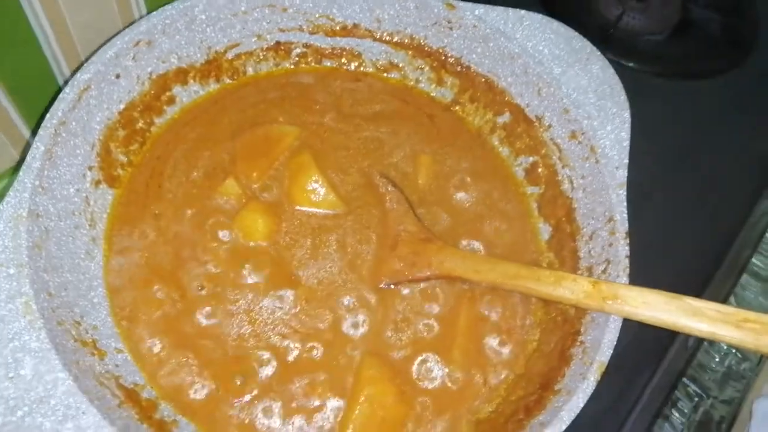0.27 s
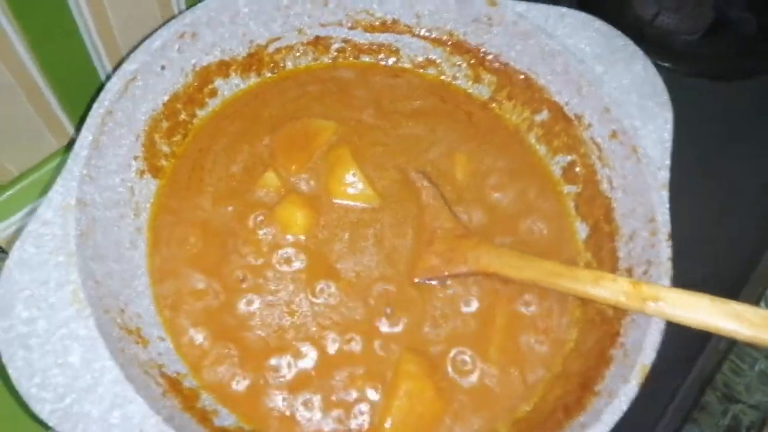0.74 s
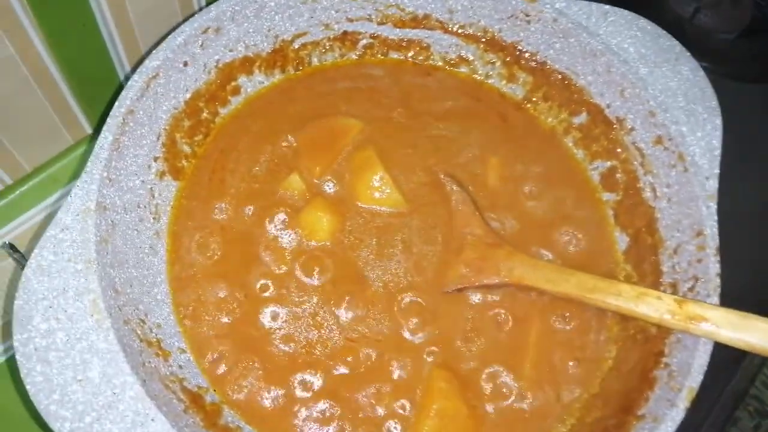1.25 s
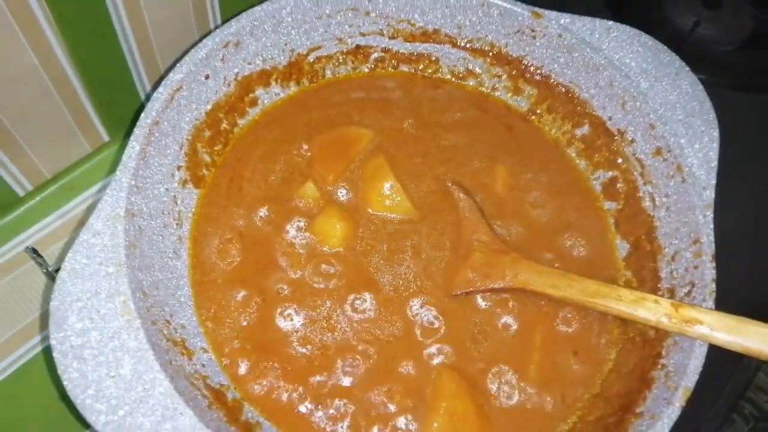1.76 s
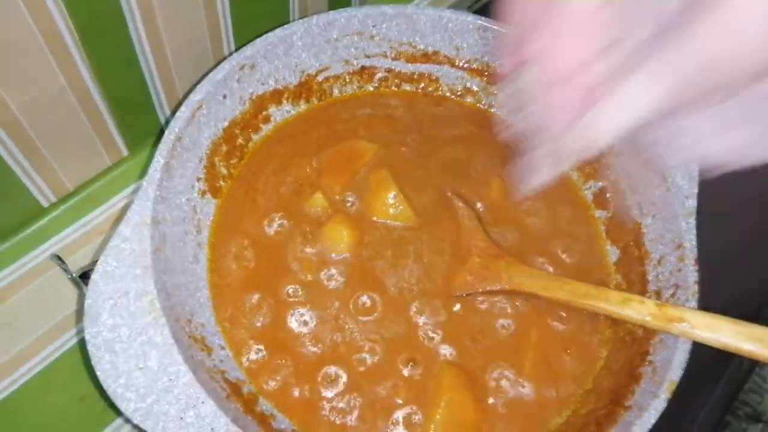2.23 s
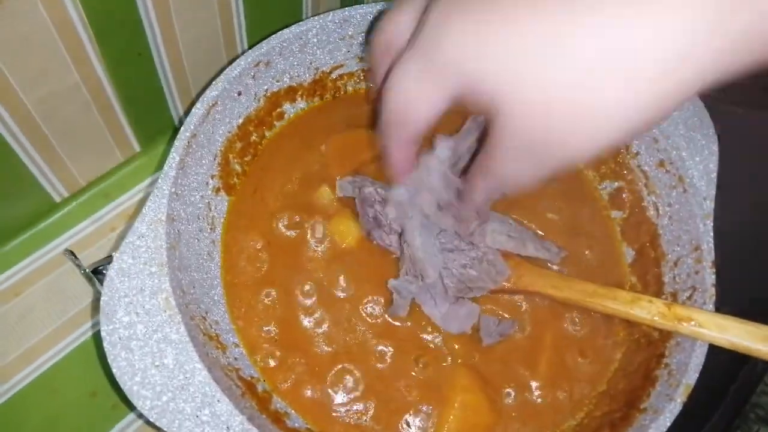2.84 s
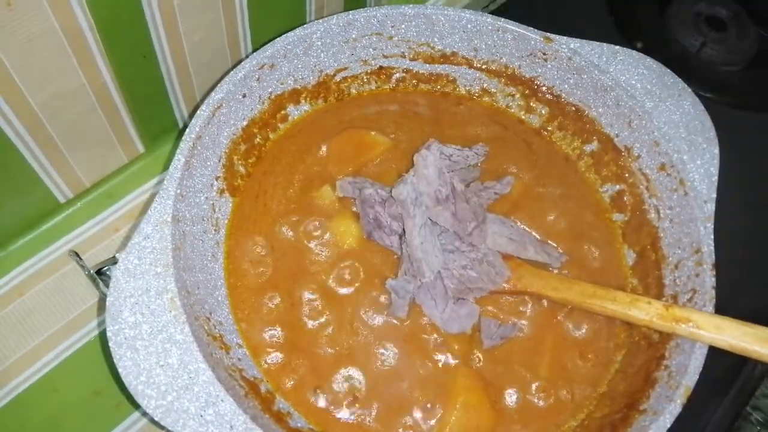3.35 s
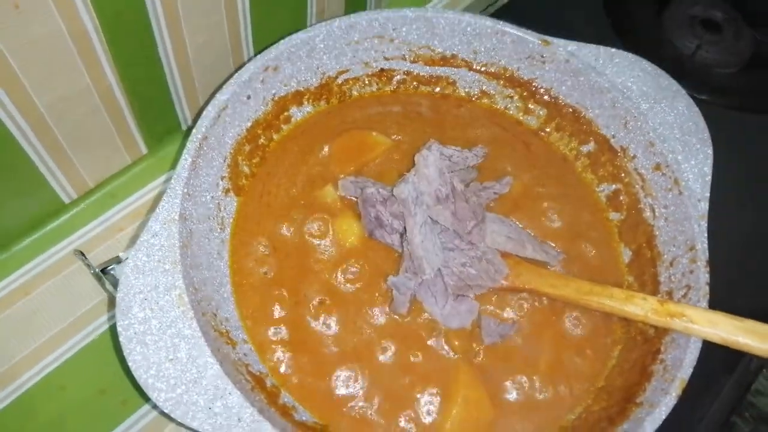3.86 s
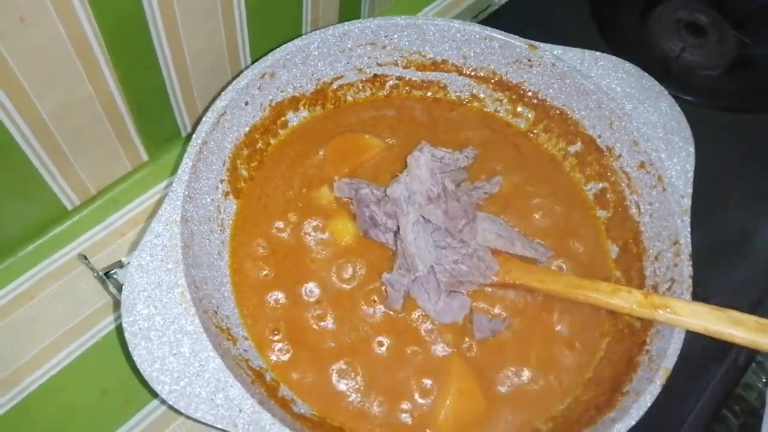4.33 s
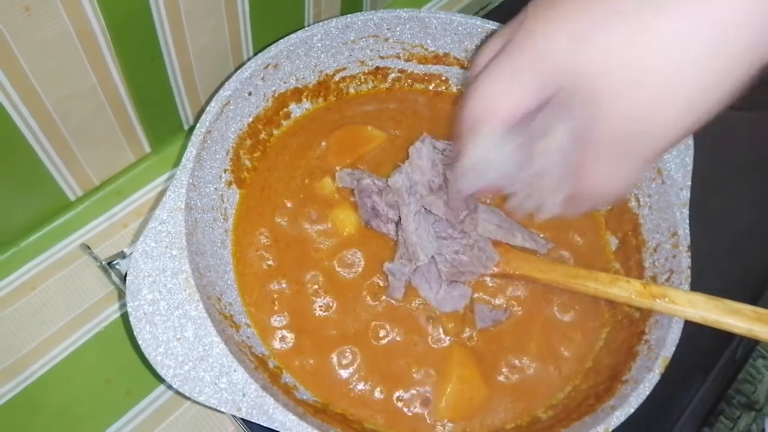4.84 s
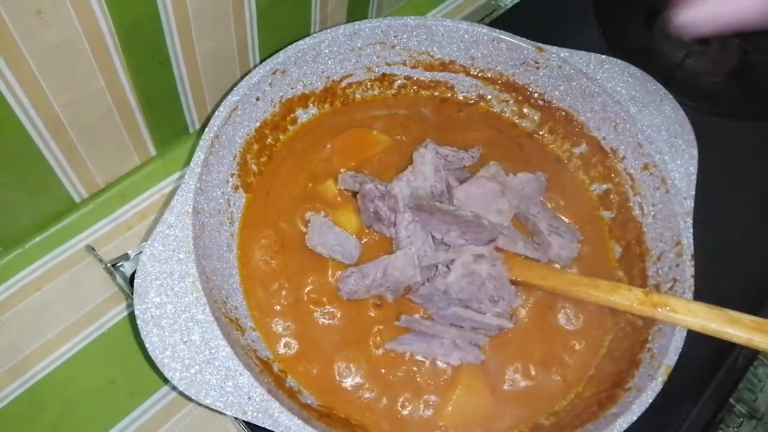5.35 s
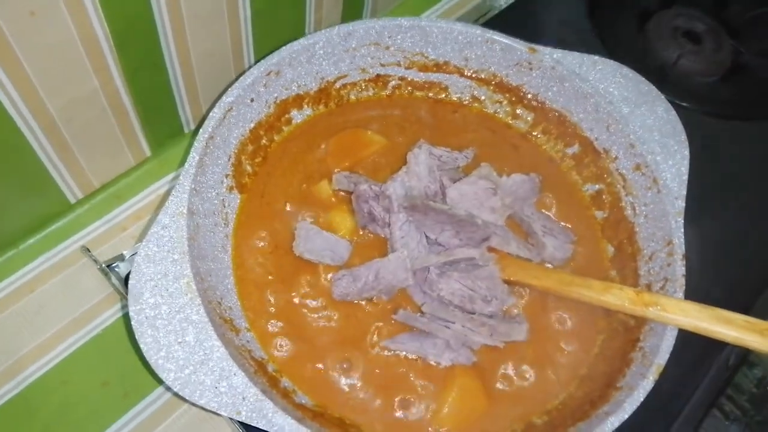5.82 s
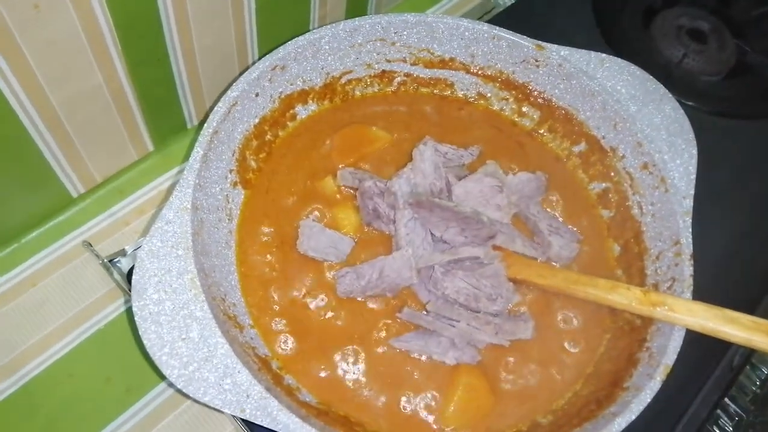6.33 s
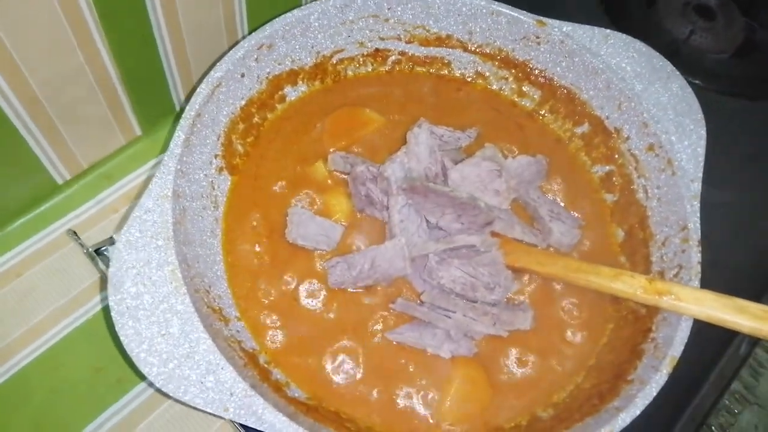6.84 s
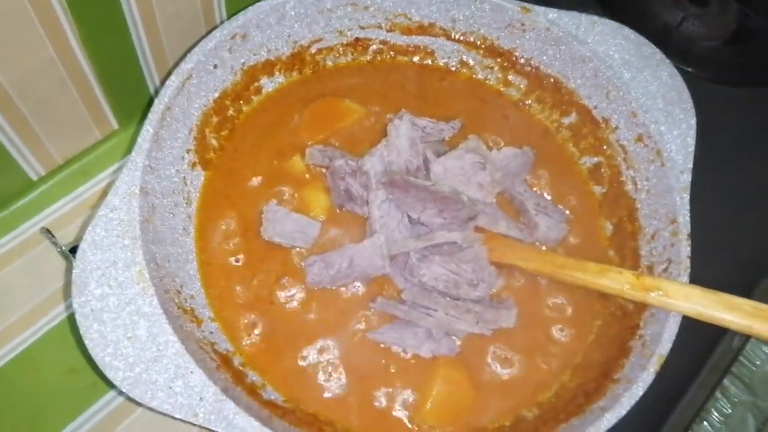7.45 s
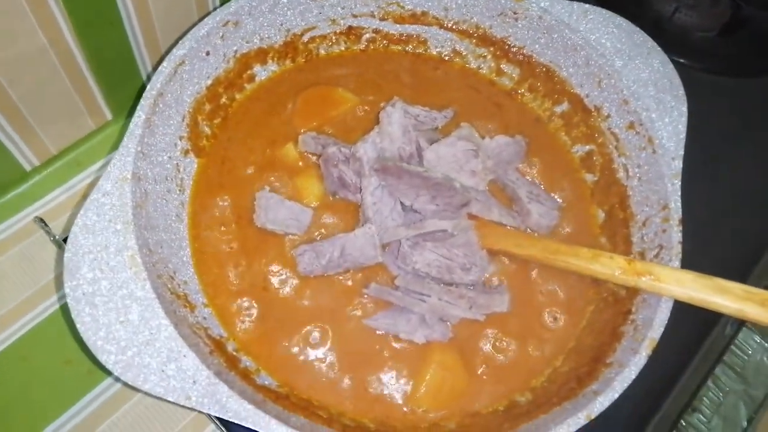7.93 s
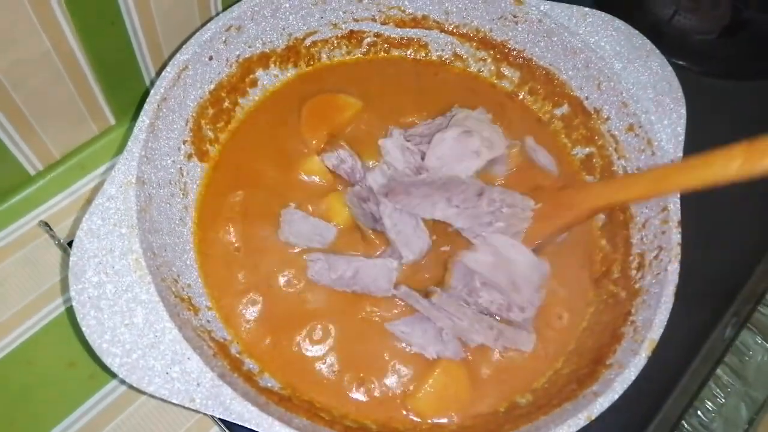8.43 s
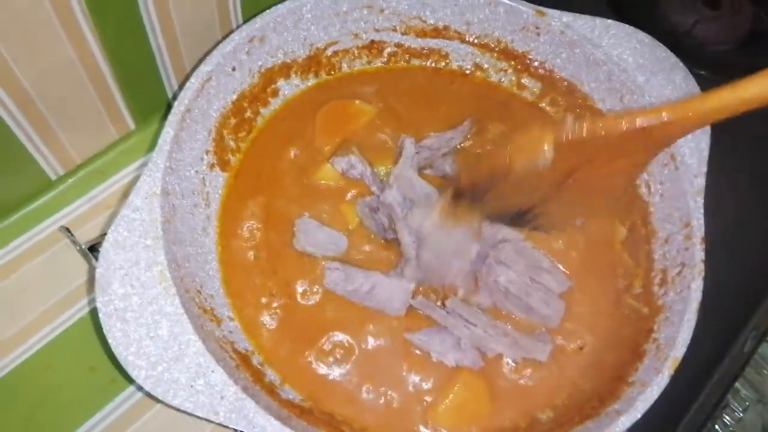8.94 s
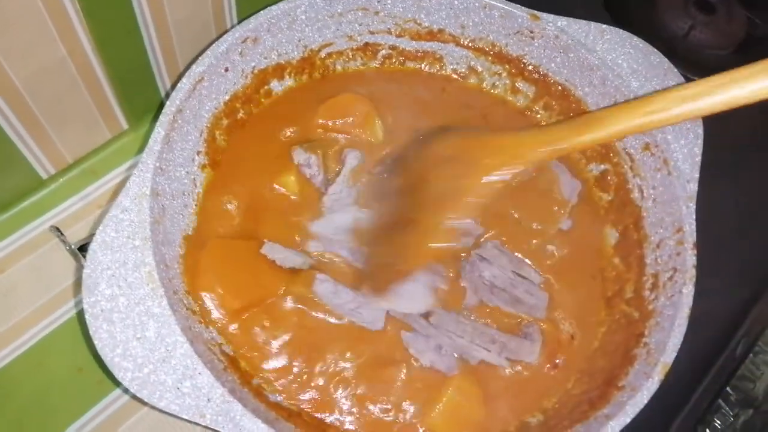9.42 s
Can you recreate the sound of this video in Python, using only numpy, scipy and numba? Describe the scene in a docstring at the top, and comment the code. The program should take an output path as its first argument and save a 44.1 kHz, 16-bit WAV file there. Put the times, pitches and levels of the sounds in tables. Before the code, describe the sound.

Close above a pan, thick curry simmers: crisp, irregular bubble ticks over faint wet fizz, with occasional low plops. One hard knock sounds near the start. A vehicle outside drones low and falls in pitch, fading over the first few seconds. Distant traffic swells later. Light rustles of hands and meat come mid-way, then wetter squelches as a spatula stirs. Nearly mono phone sound, treble dulled, small kitchen.

```python
"""A thick curry simmers in a pan below a phone: small bubbles burst as short bright ticks, large ones plop; each is
a damped tone that glides up, over crowds of faint ones and flickering wet noise. Hands and meat rustle as
crackling noise, something hard knocks as short damped modes, and soft rings are narrow noise. A vehicle outside
drones as a sine with a weak octave, falling in pitch; traffic swells behind it as hums, over steady air noise.
The level dips now and then. The microphone is nearly mono and dull above the presence range."""
import sys
import numpy as np
from scipy import signal
from scipy.fft import rfft, irfft, next_fast_len
from scipy.io import wavfile
from scipy.ndimage import uniform_filter1d
from numba import njit

SR = 44100
rng = np.random.default_rng(int(sys.argv[2]) if len(sys.argv) > 2 else 0)


def generate_wav(signal):
    """Clip the signal to [-1, 1] and save it as 16-bit WAV at the path in sys.argv[1]."""
    frames = np.transpose(np.atleast_2d(signal))
    scaled = np.clip(frames, -1, 1) * 32767
    pcm = np.round(scaled).astype(np.int16)
    wavfile.write(sys.argv[1], SR, pcm)


N = 426888  # length in samples


def undb(db):
    """Amplitude ratio of a level in dB."""
    return 10 ** (np.asarray(db) / 20)


def level(x, db):
    """Set the rms of a sound to a level in dB."""
    return x * undb(db) / np.sqrt(np.mean(x ** 2))


def curves(table):
    """Columns of a table as straight lines in time."""
    s, *columns = np.transpose(table)
    return [np.interp(np.arange(N) / SR, s, c) for c in columns]


def swells(table, rise_db_s, fall_db_s, *calm_db):
    """Each row rises to its start, holds and falls; per column, powers add up over a calm level, in dB."""
    t = np.arange(N) / SR
    power = undb(calm_db)[:, None] ** 2 * np.ones(N)
    for s, hold_s, *db in table:
        before_s = np.maximum(s - t, 0)
        after_s = np.maximum(t - s - hold_s, 0)
        shape = undb(-rise_db_s * before_s - fall_db_s * after_s) ** 2
        power = power + undb(db)[:, None] ** 2 * shape
    return 10 * np.log10(power)


def walk(rate):
    """Random levels held 1 / rate s and slewed twice; spread near 1."""
    k = int(SR / rate)
    steps = np.repeat(rng.standard_normal(N // k + 1), k)
    return 1.3 * uniform_filter1d(uniform_filter1d(steps, k), k)[:N]


def colour(x, points):
    """Filter by a spectrum of (Hz, dB) points; rms 1."""
    size = next_fast_len(len(x))
    hz, db = np.transpose(points)
    grid = np.arange(size // 2 + 1) * SR / size
    gain = undb(np.interp(np.log(grid + 1), np.log(hz), db, left=-90, right=-90))
    return level(irfft(rfft(x, size) * gain, size)[:len(x)], 0)


def band(x, lo_hz, hi_hz):
    """Keep one frequency band; rms 1."""
    sos = signal.butter(2, [lo_hz, hi_hz], "bandpass", fs=SR, output="sos")
    return level(signal.sosfilt(sos, x), 0)


def patchy(points, lo_hz, flicker_db, rate, count):
    """Noise of a given spectrum in third-octave bands, from lo_hz up, that each flicker alone; rms 1."""
    noise = colour(rng.standard_normal(N), points)
    out = 0
    for hz in lo_hz * 2 ** (np.arange(count) / 3):
        edges_hz = [hz * 2 ** (-1 / 6), hz * 2 ** (1 / 6)]
        sos = signal.butter(2, edges_hz, "bandpass", fs=SR, output="sos")
        out = out + undb(flicker_db * walk(rate)) * signal.sosfilt(sos, noise)
    return level(out, 0)


@njit
def rings(length, start_s, size, hz, t60_s, rise_s, glide, rate):
    """Damped tones that swell for rise_s and glide up by the share glide within one t60."""
    out = np.zeros(length)
    for k in range(len(hz)):
        first, phase = int(start_s[k] * rate), 0.
        for i in range(min(int(t60_s[k] * rate), length - first)):
            t = i / rate
            phase += 2 * np.pi * hz[k] * (1 + glide[k] * t / t60_s[k]) / rate
            swell = np.sin(np.pi / 2 * min(t / rise_s, 1.)) ** 2
            out[first + i] += size[k] * swell * np.exp(-np.log(1000) * t / t60_s[k]) * np.sin(phase)
    return out


def bubbles(s, db, hz, cycles, glide, rise_s, spray_db):
    """Each burst cavity rings for a few cycles, rising as it closes; droplets of other pitch land after it."""
    chance = rng.random((len(s), 11)).T
    t60_s = cycles * (.7 + .6 * chance[0]) / hz
    out = rings(N, s, undb(db), hz, t60_s, rise_s, glide * chance[1], 1. * SR)
    # three droplets for each burst
    for pitch, late, size in chance[2:].reshape(3, 3, -1):
        drop_hz = hz * 1.6 ** (pitch - .4)
        drop_s = s + 9 * late ** 2 / hz
        drop_size = undb(db + spray_db - 1.82 * size)
        out += rings(N, drop_s, drop_size, drop_hz, 1.11 * t60_s, rise_s, 0 * hz, 1. * SR)
    return out


def crowd(db, hz, spread, lift_db, tail_db, cycles, rise_s, count):
    """Many faint bursts at random times and pitches; their size follows a level curve."""
    chance = rng.random((count, 3)).T
    at = (chance[0] * (N - 1)).astype(int)
    size_db = db[at] + lift_db - tail_db * np.log(1 - .97 * chance[1])  # a few stand out
    pitch_hz = np.broadcast_to(hz, N)[at] * spread ** (chance[2] - .5)
    return bubbles(at / SR, size_db, pitch_hz, cycles, 0.069, rise_s, -1.4)


def clear_bursts():
    """Bubbles near enough to be heard singly: a larger cavity rings lower and for more cycles."""
    # The clearest small bubbles. Each row: start in seconds, peak level in dB, pitch in Hz.
    ticks = [(0.0399, -24.5, 4930), (0.152, -24, 3380), (0.167, -27, 2530), (0.2056, -21.5, 3230),
             (0.225, -28.5, 3270), (0.424, -26, 3720), (0.522, -23, 5370), (0.599, -30.5, 3900),
             (0.638, -25, 3450), (0.6553, -24, 3620), (0.908, -20, 3700), (0.925, -28.5, 3370),
             (0.9425, -21.5, 3870), (1.102, -24, 3640), (1.104, -26, 2590), (1.121, -20.5, 4450),
             (1.1343, -15.5, 5800), (1.145, -28, 4620), (1.164, -25.5, 4040), (1.273, -24, 3520),
             (1.289, -25.5, 5200), (1.322, -24.5, 3150), (1.408, -24.5, 3830), (1.5058, -22.5, 5700),
             (1.5596, -17.5, 5150), (1.6558, -23, 4860), (1.7153, -25, 3500), (1.727, -29.5, 5000),
             (1.9548, -24.5, 4450), (2.124, -29.5, 3706), (2.5398, -24, 3850), (2.653, -21, 3600),
             (2.707, -24, 5460), (2.78, -30, 3760), (2.789, -24.5, 3450), (2.811, -20, 4220),
             (2.8197, -22, 5160), (2.8913, -23.5, 3600), (2.968, -13.5, 3710), (3.013, -24, 3700),
             (3.033, -19, 4120), (3.0872, -20, 3620), (3.116, -23, 4070), (3.29, -26, 2670),
             (3.3158, -22.5, 2690), (3.405, -27, 4700), (3.51, -23, 5370), (3.541, -21, 3680),
             (3.573, -29, 4160), (3.5966, -22, 3600), (3.6311, -17.5, 3190), (3.636, -32, 2520),
             (3.6904, -22, 3520), (3.7342, -19, 3660), (3.74, -17.5, 4640), (4.3962, -26, 2400),
             (4.422, -21, 6160), (4.508, -27.5, 2100), (4.545, -27, 3160), (4.711, -19, 3560),
             (4.755, -26.5, 3800), (4.764, -27, 4100), (4.895, -25, 2440), (4.9155, -24, 3870),
             (5.172, -19.5, 2770), (5.195, -22.5, 3320), (5.2529, -22.5, 2270), (5.278, -28.5, 3400),
             (5.306, -24.5, 3440), (5.357, -20, 5800), (5.3725, -24, 3970), (5.378, -22.5, 3880),
             (5.496, -28, 2470), (5.582, -25, 4040), (5.618, -27, 2430), (5.646, -17.5, 3580),
             (5.708, -18.5, 2360), (5.797, -24, 3300), (5.827, -26, 3500), (5.8562, -17.5, 3780),
             (5.976, -26.5, 3900), (6.097, -29, 3470), (6.115, -19, 3780), (6.148, -20.5, 3620),
             (6.162, -23.5, 3810), (6.218, -25, 3970), (6.2465, -14.5, 3220), (6.2954, -22.5, 4180),
             (6.3574, -17, 3450), (6.3656, -17, 3430), (6.397, -27, 3800), (6.651, -31, 3420),
             (6.663, -25, 2520), (6.663, -20, 3670), (6.697, -25.5, 3520), (6.7321, -22.5, 3360),
             (6.9579, -24, 3070), (7.012, -20, 3230), (7.045, -25.5, 2740), (7.193, -20.5, 3700),
             (7.468, -30, 2180), (7.488, -27, 3900), (7.498, -21, 3340), (7.512, -33, 2520),
             (7.532, -30, 4450), (7.548, -26, 3250), (7.581, -23, 5300), (7.5976, -21.5, 3700),
             (7.725, -30, 4180), (7.9417, -23.5, 3730), (8.181, -29, 2100), (8.1965, -15, 2080),
             (8.209, -26, 2280), (8.2216, -21, 2400), (8.229, -25, 2610), (8.259, -22.5, 2360),
             (8.287, -25.5, 3210), (8.324, -23, 3360), (8.3355, -17.5, 3070), (8.357, -19.5, 3970),
             (8.386, -25, 3320), (8.398, -34, 4230), (8.414, -29, 3300), (8.431, -24, 2470),
             (8.4489, -13.5, 3630), (8.494, -35, 3700), (8.513, -32, 3350), (8.66, -27, 2930),
             (8.687, -28, 2700), (8.786, -22, 4840), (8.795, -26, 4740), (8.859, -25.5, 3800),
             (8.906, -23.5, 3130), (8.917, -30, 3500), (8.956, -21.5, 3670), (9.07, -27.5, 3450),
             (9.102, -29, 2530), (9.149, -29, 3200), (9.187, -24, 2460), (9.2345, -20, 5400),
             (9.25, -22, 2190), (9.268, -34, 2130), (9.278, -18, 2370), (9.295, -24.5, 2860),
             (9.486, -27.5, 2480), (9.547, -26.5, 2400)]
    # Large bubbles and squelches of the spatula. Each row: start in seconds, peak level in dB, pitch in Hz.
    plops = [(0.4, -47, 1060), (1.7914, -35.5, 838), (1.8126, -37, 890), (2.1808, -43.5, 785),
             (2.6412, -37.5, 2050), (2.9084, -43, 810), (2.9674, -43.5, 752), (4.1001, -44.5, 726),
             (4.2288, -38, 1220), (4.3214, -41, 1640), (4.5042, -35, 1280), (4.8639, -41, 1710),
             (4.9169, -34.5, 1260), (5.6453, -41.5, 710), (5.7065, -25, 1900), (5.796, -38, 1680),
             (6.061, -43, 1250), (6.111, -36.5, 1686), (6.1253, -37, 1300), (6.162, -43, 742),
             (6.2497, -40, 1210), (6.3378, -40, 1710), (6.3649, -38, 1820), (6.6617, -27, 1817),
             (6.8673, -42, 1030), (6.9743, -41, 1640), (7.1598, -37, 1740), (7.4195, -39, 424),
             (7.4351, -37, 504), (7.4704, -39, 666), (8.025, -39.5, 666), (8.051, -42.5, 730),
             (8.1864, -25, 1134), (8.2682, -37.5, 683), (8.325, -30.5, 1740), (8.3523, -33, 1680),
             (8.9691, -43.5, 570), (9.124, -44.5, 710), (9.149, -40.5, 682), (9.1892, -24.5, 1723),
             (9.237, -35.5, 647), (9.2482, -26, 1990), (9.2695, -33, 876), (9.2847, -24, 1735)]
    s, db, hz = np.transpose(ticks)
    small = bubbles(s, db, hz, cycles=18.5, glide=0.17, rise_s=0.00089, spray_db=-9.5)
    s, db, hz = np.transpose(plops)
    large = bubbles(s, db, hz, cycles=50.3, glide=0.45, rise_s=0.0023, spray_db=-12.0)
    return small + large


def faint_bursts(fizz_db, fizz_hz, gurgle_db, squelch_db):
    """Crowds of small, middle and large cavities, ringing too faintly to be told apart."""
    small = crowd(fizz_db, fizz_hz, 2.1, lift_db=1.5, tail_db=6.5, cycles=24.7, rise_s=0.00061, count=2400)
    small += crowd(fizz_db, fizz_hz, 1.7, lift_db=12.5, tail_db=2, cycles=28, rise_s=0.0005, count=400)
    small += crowd(fizz_db, 6400., 1.4, lift_db=4, tail_db=3.5, cycles=28, rise_s=0.0005, count=300)
    middle = crowd(squelch_db, 1650., 1.6, lift_db=-4.5, tail_db=4.0, cycles=19.9, rise_s=0.00082, count=1200)
    large = crowd(gurgle_db, 723.0, 1.3, lift_db=0.0, tail_db=3.0, cycles=10.4, rise_s=0.001, count=700)
    return small + middle + large


def wet_hiss(fizz_db, gurgle_db, squelch_db):
    """Noise of the wet surface: a high fizz, a squelch and a low gurgle in bands that flicker alone."""
    # Spectrum of the fizz. Each row: frequency in Hz, density in dB per Hz.
    fizz_spectrum = [(1500, -30), (2200, -10), (2800, -4), (3800, 0), (5000, -3), (6200, -5), (8000, -20),
                     (11000, -50)]
    # Spectrum of the sloshing liquid. Each row: frequency in Hz, density in dB per Hz.
    slosh_spectrum = [(250, -25), (400, -3), (700, 0), (1700, -2), (2600, -6), (4000, -25)]
    fizz = undb(fizz_db - 11) * patchy(fizz_spectrum, 2400, 3, 22, count=6)
    squelch = undb(squelch_db - 6) * patchy(slosh_spectrum, 1275, 4, 45, count=4)
    gurgle = undb(gurgle_db - 6.5) * patchy(slosh_spectrum, 398.4, 4.5, 12, count=5)
    return fizz + squelch + gurgle


def sloshes():
    """Levels in dB of the gurgle and squelch as the thick liquid sloshes."""
    # Wet sloshes. Each row: start in seconds, hold in seconds, low gurgle in dB, higher squelch in dB.
    slosh_rows = [(0, 0.0074, -49.5, -45.5), (.4, 0.02, -58, -78), (1.8, 0.024, -55.5, -89),
                  (2.19, 0.025, -64, -76), (2.62, 0.0088, -56, -56.5), (2.92, 0.11, -76, -62),
                  (4.22, 0.1, -54.5, -57), (4.33, 0.087, -72, -51.5), (4.51, 0.034, -57.5, -50.5),
                  (4.9, 0.047, -48, -50), (5.25, 0.019, -54, -52), (5.62, 0.13, -49.5, -50.5),
                  (5.88, 0.073, -53, -48), (6.08, 0.077, -47, -44), (6.3, 0.018, -53, -68),
                  (6.5, 0.01, -53.5, -73), (6.66, 0.034, -63, -51.5), (6.98, 0.049, -51, -46.5),
                  (7.17, 0.014, -59, -47), (7.425, 0.061, -59, -52.5), (8.02, 0.011, -49.5, -57),
                  (8.184, 0.053, -46.5, -40.5), (8.31, 0.13, -53, -50.5), (8.7, 0.012, -50, -52.5),
                  (8.88, 0.062, -55.5, -62), (9.1, 0.15, -48.5, -57), (9.19, 0.087, -41, -43),
                  (9.57, 0.13, -50, -53.5)]
    calm_gurgle_db, calm_squelch_db = -65.5, -64.5  # between sloshes
    return swells(slosh_rows, 493, 121.5, calm_gurgle_db, calm_squelch_db)  # rise, fall in dB per second


def fizz_drops():
    """Level change of the fizz in dB: a rounded hollow at each brief drop in level."""
    # Brief drops in the level of the fizz. Each row: middle in seconds, depth in dB,
    # seconds from the middle to about half the depth.
    hollows = [(0.34, -15.5, 0.11), (0.564, -3, .04), (1.071, -5, 0.02), (1.864, -6, 0.039),
               (2.018, -19, 0.014), (2.18, -12, 0.042), (2.347, -24, 0.085), (3.247, -4, 0.03),
               (3.451, -24, 0.023), (4.347, -0.5, 0.016), (4.802, -19, 0.0097), (4.977, -20, 0.034),
               (5.242, -11, 0.062), (5.68, -21, 0.016), (6.593, -18, 0.024), (6.787, -11, 0.044),
               (7.34, -10, 0.091)]
    t = np.arange(N) / SR
    return sum(db * np.clip(1 - ((t - s) / half_s / 2) ** 2, 0, 1) ** 2 for s, db, half_s in hollows)


def simmer(squelch_db):
    """Level in dB and pitch in Hz of the fizz: the surface seethes in fits and a squelch throws up more."""
    # How hard the surface fizzes. Each row: time in seconds, level in dB, centre pitch in Hz.
    surface = [(0, -64, 3600), (.3, -47, 3970), (.74, -68, 3530), (.93, -54, 3990), (1.2, -54.5, 3740),
               (1.5, -58.5, 4860), (1.9, -59, 4390), (2.12, -52.5, 4410), (2.28, -37.5, 3670),
               (2.45, -56, 4060), (2.82, -55, 4380), (3.2, -59, 3680), (3.35, -59.5, 3150),
               (3.6, -54.5, 3740), (3.84, -56, 4000), (3.92, -62, 4080), (4.4, -61, 3520),
               (4.75, -55.5, 4190), (5.1, -59.5, 3150), (5.4, -53.5, 3990), (5.77, -55.5, 3140),
               (6.4, -59.5, 3530), (6.85, -58.5, 3660), (7.2, -57, 3750), (7.46, -59, 2700),
               (7.6, -58, 3560), (7.83, -73, 3640), (7.95, -58.5, 3480), (8.15, -58, 3000),
               (8.55, -65.5, 4150), (8.9, -55, 4290), (9.3, -58, 3560), (9.68, -58.5, 4610)]
    surge_db, surges_per_s, spatter_db = 2.5, 14, -15
    surface_db, fizz_hz = curves(surface)
    uneven = undb(surface_db + fizz_drops() + surge_db * walk(surges_per_s))
    spatter = undb(squelch_db + spatter_db)
    return 20 * np.log10(np.hypot(uneven, spatter)), fizz_hz


def boil():
    """The clear bursts, over crowds of faint ones and a thin wet hiss."""
    gurgle_db, squelch_db = sloshes()
    fizz_db, fizz_hz = simmer(squelch_db)
    faint = faint_bursts(fizz_db, fizz_hz, gurgle_db, squelch_db)
    return clear_bursts() + faint + wet_hiss(fizz_db, gurgle_db, squelch_db)


def kitchen(x):
    """A short diffuse tail: decaying noise that follows the direct sound."""
    room_db, room_t60_s = -10.5, .14
    t = np.arange(int(.3 * SR)) / SR
    tail = rng.standard_normal(len(t)) * undb(-60 * t / room_t60_s) * (t > .004)
    response = tail * undb(room_db) / np.sqrt(np.sum(tail ** 2))
    response[0] = 1  # direct sound
    return signal.fftconvolve(x, response)[:N]


def rustle():
    """Thin crackle at the top of the range while hands and food move, with a few sharp snaps."""
    # Dry rustles of hands and food. Each row: start in seconds, hold in seconds, level in dB.
    hands = [(0, .02, -65.5), (4.88, 0.094, -61), (5.93, 0.14, -60), (6.08, 0.089, -54.5),
             (8.205, 0.027, -58.5), (8.78, 0.18, -64.5), (8.93, 0.3, -58.5)]
    # Thin dry snaps at the very top. Each row: start in seconds, peak level in dB.
    snap_rows = [(0.471, -34.5), (0.916, -42), (1.105, -42.5), (2.0827, -43), (2.5448, -43), (3.029, -44),
                 (3.575, -48), (4.3819, -45), (5.391, -47), (5.646, -55), (5.798, -49), (6.169, -43),
                 (6.247, -50), (6.365, -40), (8.21, -41), (8.222, -46), (8.8574, -41.5), (9.133, -45),
                 (9.2953, -37), (9.644, -45)]
    swish_db = 3  # lift of the smooth hiss below the crackle
    (db,) = swells(hands, 262, 191, -80)  # rise and fall in dB per second, calm level in dB
    t = np.arange(N) / SR
    snaps = sum((t > s) * undb(peak_db - 60 * np.abs(t - s) / 0.015) for s, peak_db in snap_rows)
    crackle = undb(db - 7 + 4.0 * walk(400))
    flicker_db = 2.7 * walk(30) + 4.0 * walk(250)
    swish = undb(db + swish_db + flicker_db) * band(rng.standard_normal(N), 1800, 7500)
    top = band(rng.standard_normal(N), 6500, 12000)
    crackle_noise = band(band(top, 5000, 10000), 5500, 13000)
    return swish + crackle * crackle_noise + snaps * top


def knock():
    """Hard blows on one object: short modes, then a scattered ring around the strongest ones."""
    # Modes of the struck object. Each row: frequency in Hz, level in dB, decay by 60 dB in seconds.
    modes = [(1735, 3, 0.03), (1610, -26, 0.069), (1645, -13, 0.13), (1824, -2.5, 0.048), (880, -8, 0.035),
             (980, -16.5, 0.091), (588, -29.5, 0.22), (1250, -13.5, 0.05), (2250, -15, 0.014),
             (269, -28, 0.29), (2600, 5, 0.0028), (5470, 5, 0.0027)]
    # Blows. Each row: start in seconds, strength in dB.
    blows = [(0.07, -39), (0.105, -41), (0.151, -43), (0.4708, -14.5)]
    tail_db, tail_t60_s = -15.5, 0.26
    hz, db, t60_s = np.transpose(modes)
    tail = band(rng.standard_normal(N), 1600, 1920)
    tail = tail + undb(-5.5) * band(rng.standard_normal(N), 270, 4200)
    out = 0
    for s, blow_db in blows:
        t = np.arange(N) / SR - s
        fade = (t > 0) * undb(tail_db - 60 * np.abs(t) / tail_t60_s)
        struck = rings(N, s + 0 * hz, undb(db), hz, t60_s, 0.00032, 0 * hz, 1. * SR)
        out = out + undb(blow_db) * (struck + fade * tail)
    return out


def soft_rings():
    """Noise in narrow resonances, each sounding for a moment."""
    # Soft rings that come and go, one of them (151 Hz) the engine's octave growing stronger.
    # Each row: start in seconds, hold in seconds, level in dB, pitch in Hz, width in Hz.
    ring_rows = [(0.625, 0.24, -53, 258, 85), (1, 0.32, -63.5, 2530, 280), (1.09, 0.087, -57, 440, 140),
                 (1.468, 0.068, -52.5, 258, 53), (1.665, 0.41, -51, 151, 9.9),
                 (2.545, 0.029, -51, 267, 110), (3.62, 0.16, -58, 381, 25), (5.293, 0.19, -58, 1810, 310),
                 (5.798, 0.19, -51, 296, 37), (5.805, 0.21, -59.5, 400, 31), (5.842, 0.1, -56.5, 1820, 160),
                 (6.782, 0.27, -57.5, 1070, 110), (6.992, 0.29, -59.5, 473, 44),
                 (7.442, 0.042, -49.5, 585, 270), (7.518, 0.39, -65.5, 490, 60),
                 (8.405, 0.055, -47.5, 247, 40), (9.58, .1, -56.5, 266.6, 21)]
    rise_db_s, fall_db_s, silent_db = 252, 150.5, -200
    noise, out = rng.standard_normal(N), 0
    for s, hold_s, db, hz, width_hz in ring_rows:
        (shape_db,) = swells([(s, hold_s, db)], rise_db_s, fall_db_s, silent_db)
        out = out + undb(shape_db) * band(noise, hz - width_hz / 2, hz + width_hz / 2)
    return out


def vehicle():
    """An engine heard through the walls: a wavering sine at the firing rate with a weak octave."""
    # Passing vehicle. Each row: time in seconds, firing rate in Hz, level in dB.
    drone = [(0.0, 86.7, -40), (0.03, 89.4, -35.5), (0.32, 86, -33), (0.44, 86.15, -46.5),
             (0.89, 80.9, -27.5), (1.18, 79.3, -26), (1.92, 73.2, -38), (2.7, 71.1, -58),
             (3.69, 67.8, -52.5), (4.0, 66.4, -93)]
    hz, db = curves(drone)
    gone = np.clip((drone[-1][0] - np.arange(N) / SR) * 10, 0, 1)  # fades out over the last 0.1 s
    phase = 2 * np.pi * np.cumsum(hz) / SR
    octave = undb(-24 + 3 * walk(12)) * np.sin(2 * phase)
    return np.sqrt(2) * gone * undb(db + 1.45 * walk(20.95)) * (np.sin(phase) + octave)


def traffic():
    """Distant traffic: wavering low notes and bands of noise that swell over a deep rumble."""
    # Deep rumble. Each row: time in seconds, level in dB.
    deep = [(0, -37), (.62, -44.5), (1.4, -37.5), (2.45, -53.5), (3.9, -55), (4.55, -43.5), (5.1, -51.5),
            (5.6, -49), (6.25, -47.5), (6.6, -51), (7.2, -57), (8.3, -45), (8.55, -49), (9.68, -52.5)]
    # Swells. Each row: start in seconds, hold in seconds, hum in dB, upper hum in dB, boom in dB.
    swell_rows = [(1.0, 0.57, -40.5, -63, -61), (2.05, 0.042, -59.5, -59.5, -67),
                  (2.52, 0.065, -53.5, -58, -80), (3.6, 0.033, -69, -48.5, -56.5),
                  (4.3, 0.66, -37.5, -46.5, -74), (5.0, 0.39, -42.5, -49.5, -67),
                  (5.85, 0.48, -58.5, -61, -60), (6.9, 0.67, -57.5, -57.5, -64),
                  (8.1, 0.31, -41, -57.5, -68), (8.75, 0.027, -48, -70, -85),
                  (9.2, 0.12, -52.5, -56.5, -60)]
    # Notes of the upper hum. Each row: multiple of a quarter of the hum note, level in dB.
    upper_notes = [(5, -5.5), (6, -3), (7, -14), (8, -19.5), (9, -13)]
    hum_hz, note_db = 112, -2.5
    (deep_db,) = curves(deep)
    # rise and fall in dB per second, then the calm levels in dB
    hum_db, upper_db, boom_db = swells(swell_rows, 51.5, 56.5, -55.5, -67.5, -67.5)
    noise = rng.standard_normal((5, N))
    turn = np.pi / 2 * np.cumsum(hum_hz * (1 + .008 * walk(2))) / SR  # phase of a quarter of the hum note

    def note(k):
        """A wavering sine at k quarters of the hum note."""
        return undb(note_db + 0.85 * walk(7.8)) * np.sin(round(k) * turn)

    rumble = undb(deep_db + 1.9 * walk(4.0)) * band(noise[0], 10.0, 57)
    hum = note(4) + undb(-7.5) * band(noise[1], 84.3, 138.3)
    upper = sum(undb(db) * note(k) for k, db in upper_notes)
    upper = upper + undb(-4) * band(noise[2], 135.4, 161.0)
    boom = band(noise[3], 235.7, 290.6) + undb(-1.5) * band(noise[4], 190, 480)
    return rumble + undb(hum_db) * hum + undb(upper_db) * upper + undb(boom_db) * boom


def still_air():
    """Steady background noise, strongest in the bass."""
    # Spectrum of the background. Each row: frequency in Hz, density in dB per Hz.
    air_spectrum = [(12, -29), (20, 5), (109, 7), (199, -12.5), (261, -16.5), (336, -14.5), (911, -9),
                    (1390, -33.5), (2290, -33), (3680, -40.5), (5630, -41.5), (7790, -60), (10100, -76.5),
                    (17100, -120)]
    return undb(-59.5) * colour(rng.standard_normal(N), air_spectrum)


def dips():
    """Gain of the whole level, which drops suddenly and creeps back."""
    # Each row: lowest moment in seconds, depth in dB, recovery in seconds.
    drops = [(7.3, -4.5, 0.27), (8.453, -10, 0.25), (9.33, -6, 0.31)]
    fall_s = 0.035
    t = np.arange(N) / SR
    return undb(sum(np.interp(t, [s - fall_s, s, s + back_s], [0, db, 0]) for s, db, back_s in drops))


def scene():
    """Pan, hands and soft rings, the street and air behind, all through the dips, in near mono."""
    near = kitchen(boil()) + rustle() + knock() + soft_rings()
    mid = dips() * (near + vehicle() + traffic() + still_air())
    # left and right differ only slightly, by a delayed share of the same sound, more so in the treble
    side_bass_db, side_db = -35, -25
    late = np.roll(mid, 220)  # 5 ms
    side = undb(side_bass_db) * late + undb(side_db) * np.diff(late, prepend=0)
    return np.array([mid + side, mid - side])


def record(dry):
    """The microphone dulls the treble, adds a faint hiss and the phone cuts the top."""
    # Response of the microphone. Each row: frequency in Hz, gain in dB.
    mic_response = [(10, 1.5), (5500, -1), (6500, -3.5), (8000, -14), (10000, -19), (15000, -23),
                    (23000, -40)]
    self_noise_db, top_hz = -95, 14900
    hz, db = np.transpose(mic_response)
    grid = np.linspace(0, SR / 2, 257)
    gain = undb(np.interp(np.log(grid + 1), np.log(hz), db))
    taps = signal.firwin2(255, grid, gain, fs=SR)
    dull = signal.fftconvolve(dry, taps[None], "same", axes=1)
    dull = dull + undb(self_noise_db) * band(rng.standard_normal(N), 4000, 16000)
    return signal.sosfilt(signal.ellip(8, .2, 70, top_hz, fs=SR, output="sos"), dull)


dry = scene()
out = record(dry)
generate_wav(out)
```